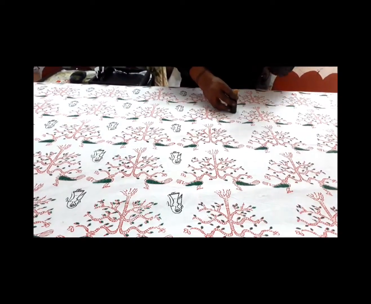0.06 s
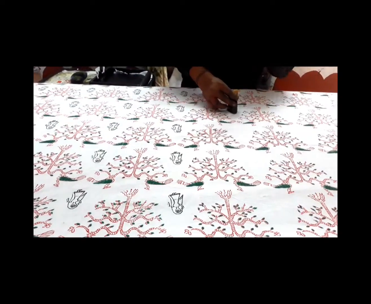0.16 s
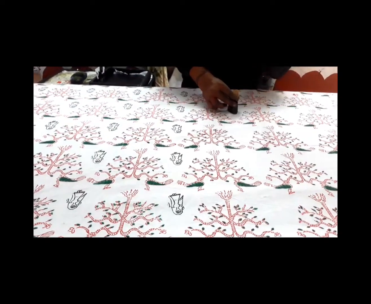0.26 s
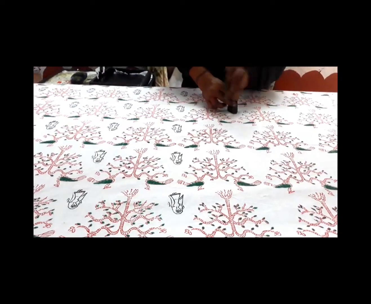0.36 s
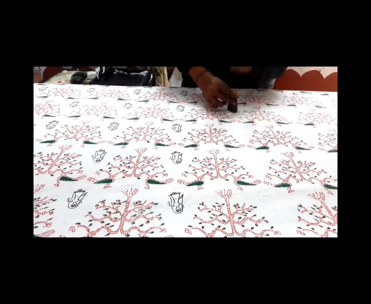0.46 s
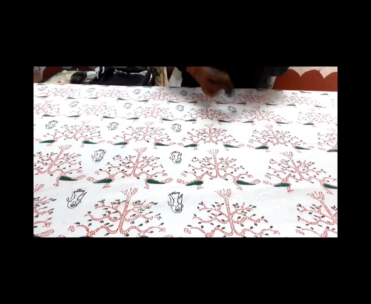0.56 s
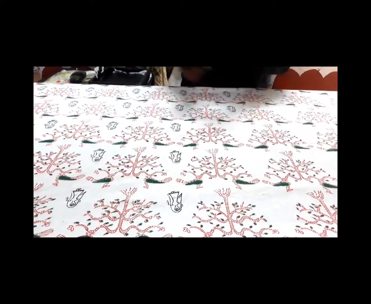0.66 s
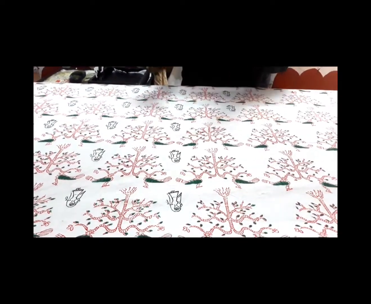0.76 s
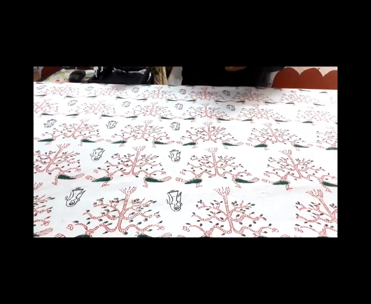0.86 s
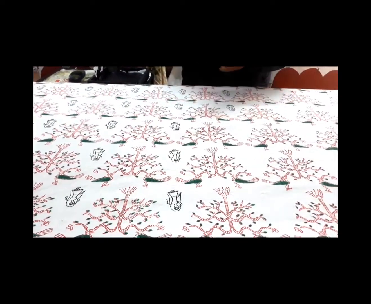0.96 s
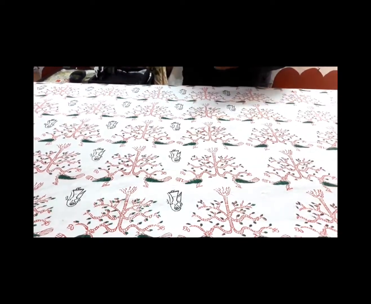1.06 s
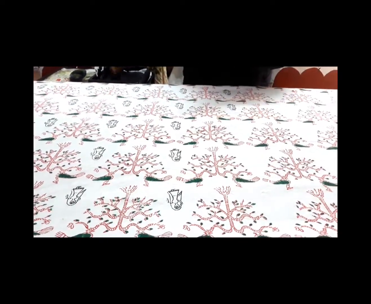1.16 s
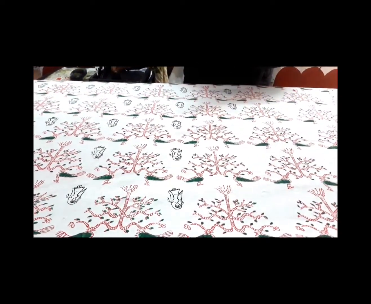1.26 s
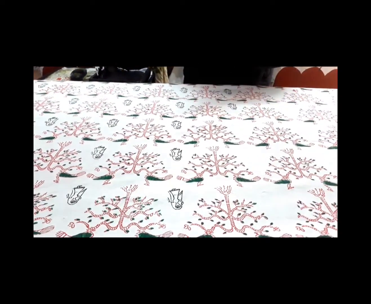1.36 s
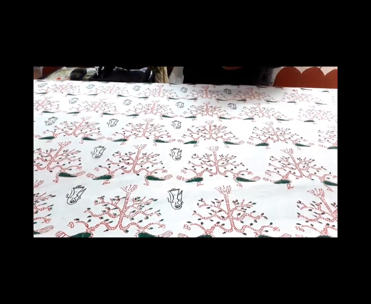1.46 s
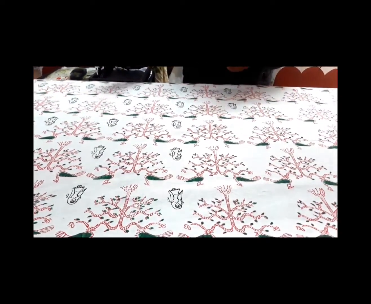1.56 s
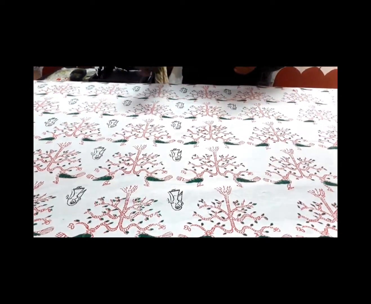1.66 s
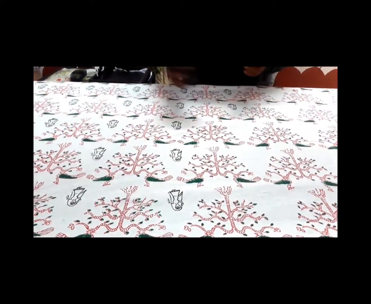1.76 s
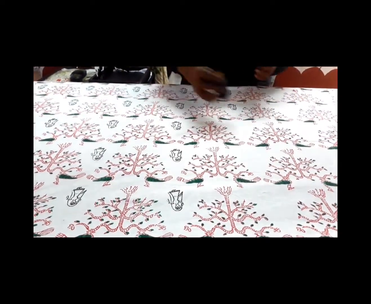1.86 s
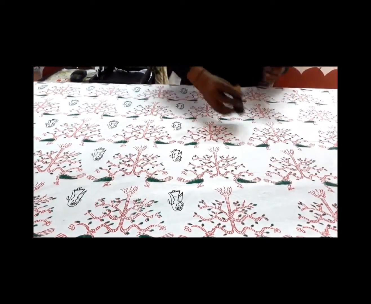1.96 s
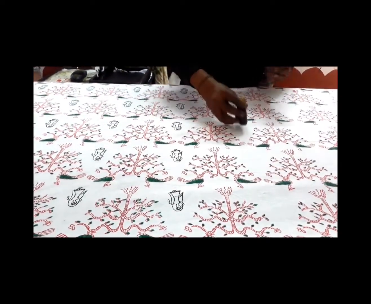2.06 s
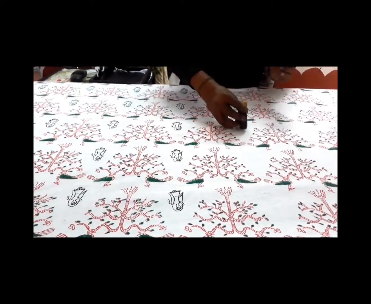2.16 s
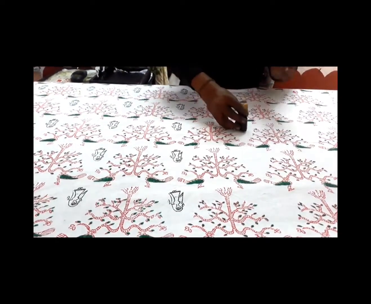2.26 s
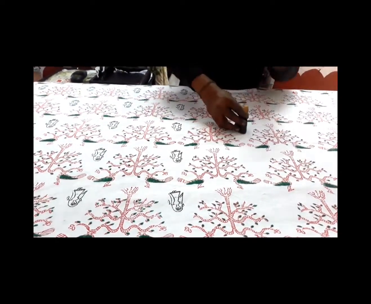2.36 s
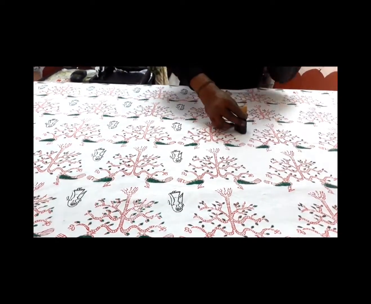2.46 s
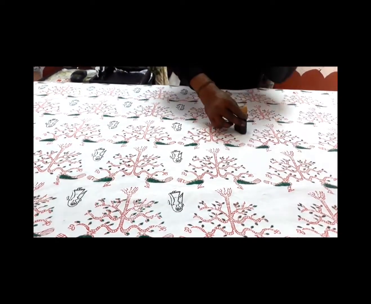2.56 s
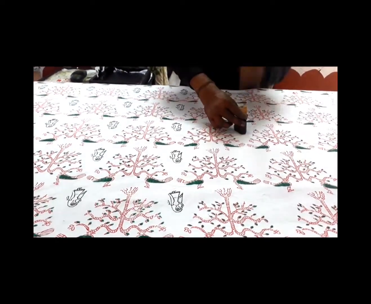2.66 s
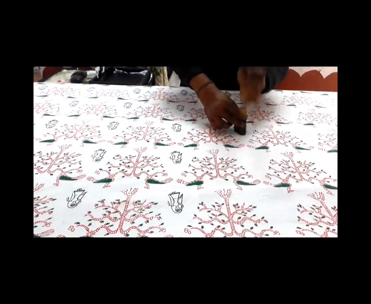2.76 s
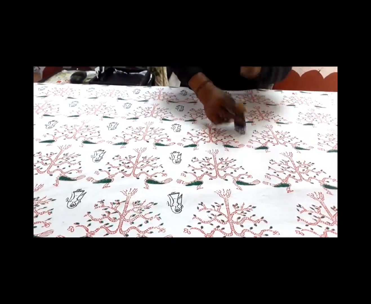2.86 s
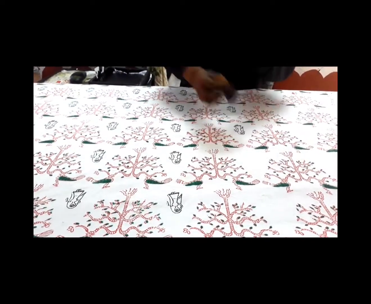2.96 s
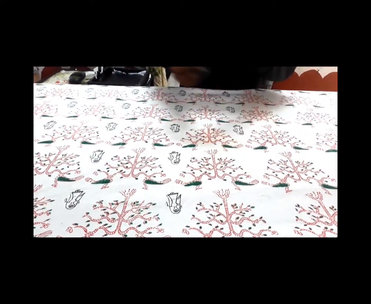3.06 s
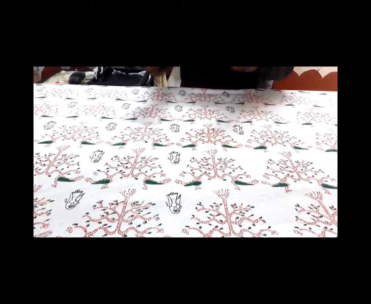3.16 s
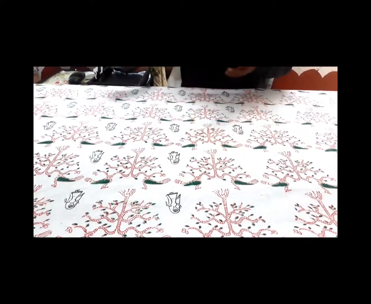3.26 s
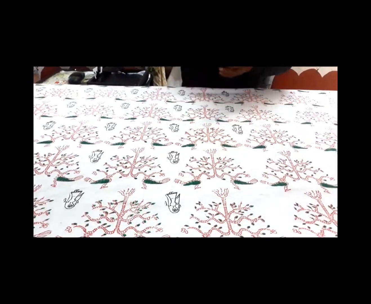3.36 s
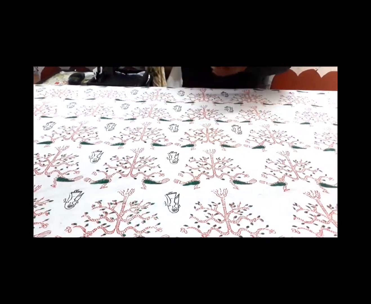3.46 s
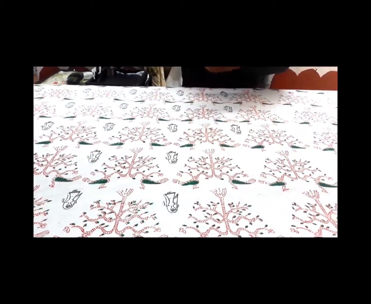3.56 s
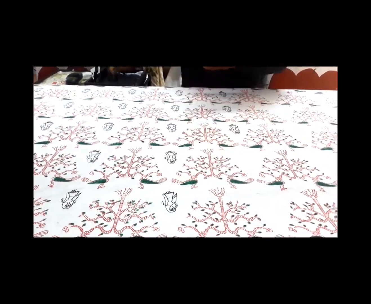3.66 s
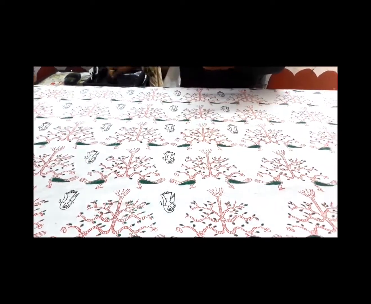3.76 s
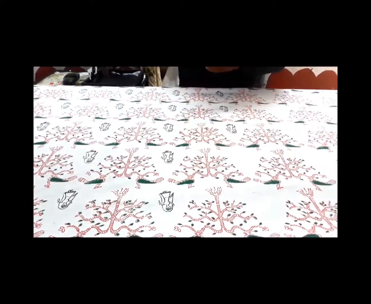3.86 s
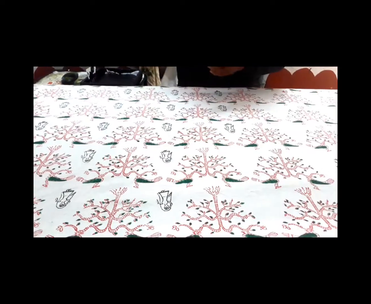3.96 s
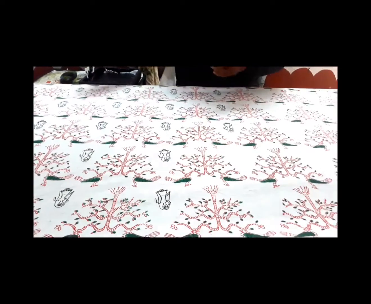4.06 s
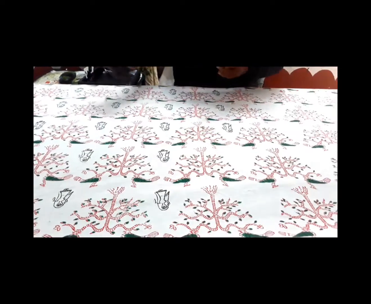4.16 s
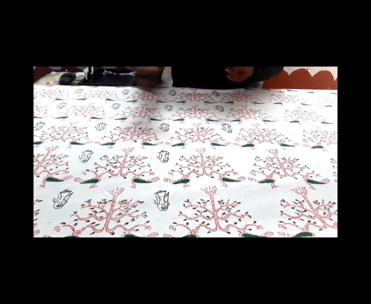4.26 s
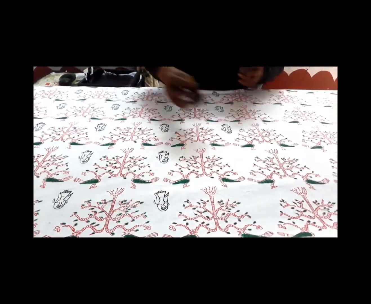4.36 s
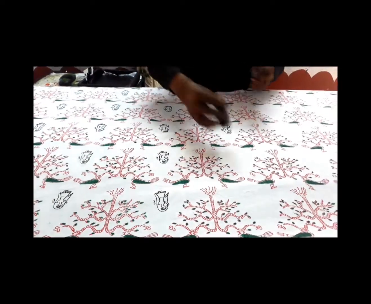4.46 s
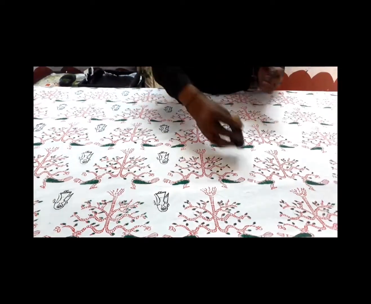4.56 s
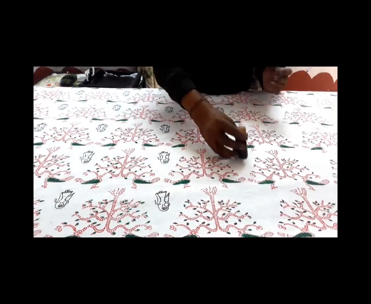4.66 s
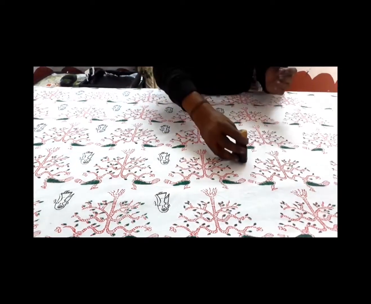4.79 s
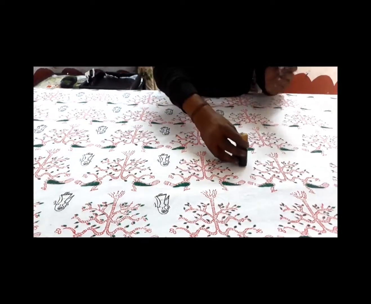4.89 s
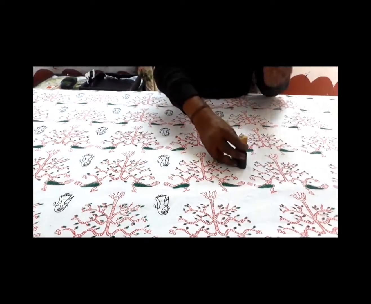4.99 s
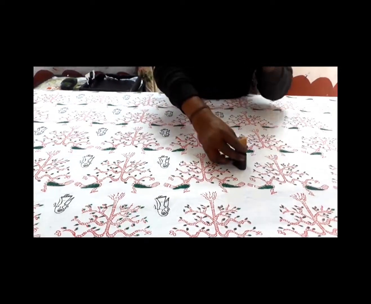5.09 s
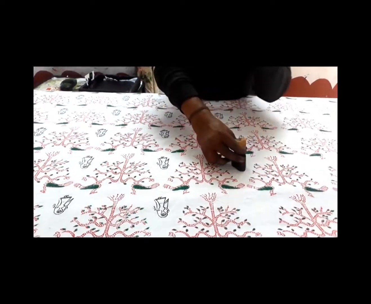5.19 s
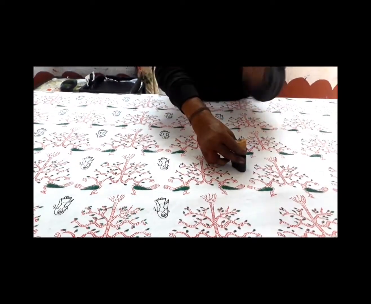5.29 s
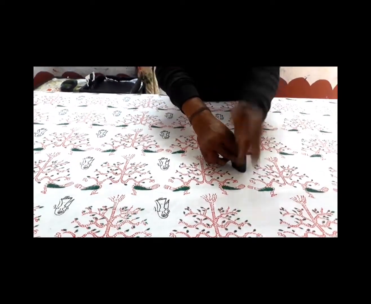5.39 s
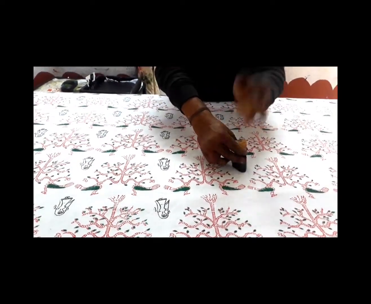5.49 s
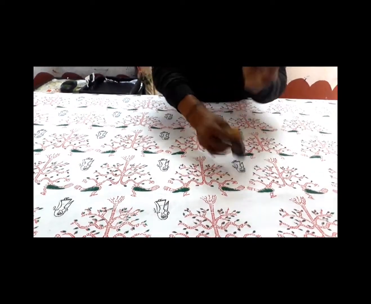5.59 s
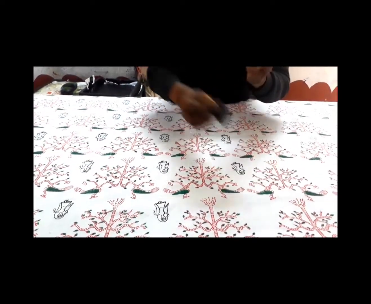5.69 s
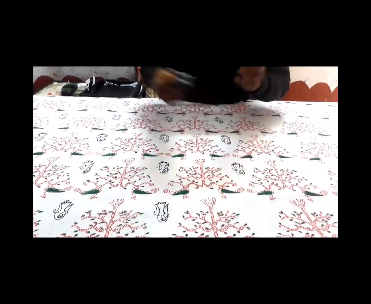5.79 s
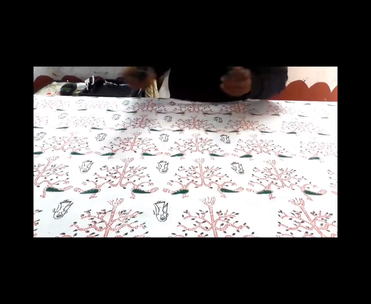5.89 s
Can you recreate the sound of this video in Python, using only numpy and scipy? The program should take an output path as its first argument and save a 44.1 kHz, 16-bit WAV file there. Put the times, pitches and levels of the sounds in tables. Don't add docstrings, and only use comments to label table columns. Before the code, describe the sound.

Three low wooden thumps of a hand-struck printing block on a padded table, with cloth swishes, small clacks and handling bumps over quiet room hum.

```python
import sys
import numpy as np
from scipy import signal
from scipy.io import wavfile

SR = 44100
rng = np.random.default_rng(int(sys.argv[2]) if len(sys.argv) > 2 else 0)


def int16_out(signal):
    q = np.round(np.clip(np.atleast_2d(signal).T, -1, 1) * 32767)
    wavfile.write(sys.argv[1], SR, q.astype(np.int16))


def boost_factor(decibels):
    exponent = np.asarray(decibels, float) / 20
    return 10 ** exponent


N = 261449

# (time [s], peak level [dB], slap level [dB], slap pitch [Hz], rebound level [dB])
BLOWS = [
    (0.419, -29.5, -52, 2740, -6),
    (2.7680, -28, -54, 2880, -6.5),
    (5.4409, -26, -40.5, 5020, -16.5),
]


def at_hz(points, hz, column):
    points = np.array(points)
    return np.interp(np.log(hz), np.log(points[:, 0]), points[:, column])


def rms_one(x):
    return x / np.sqrt(np.mean(x ** 2) + 1e-20)


def drift(rate):
    r = np.exp(-80 * np.pi * rate / SR)
    slow = signal.lfilter([1], [1, -2 * r, r * r], rng.standard_normal(N // 40 + 2002))[2000:]
    return np.interp(np.arange(N) / 40, np.arange(len(slow)), rms_one(slow))


def ring(x, hz, t60):
    r = boost_factor(-60 / (t60 * SR))
    w = 2 * np.pi * hz / SR
    return signal.lfilter([0, np.sin(w)], [1, -2 * r * np.cos(w), r * r], x + 1e-18)


def resonance(x, hz, width_hz):
    r = np.exp(-np.pi * width_hz / SR)
    top_gain_one = np.array([1, 0, -1]) * (1 - r * r) / 2
    return signal.lfilter(top_gain_one, [1, -2 * r * np.cos(2 * np.pi * hz / SR), r * r], x)


def bands(white, low_hz, count):
    edges = low_hz * 2 ** (np.arange(count + 1) / 3)
    out = []
    for k, (a, b) in enumerate(zip(edges, edges[1:])):
        band_pass = signal.butter(2, [a, b], "band", fs=SR, output="sos")
        out.append((np.sqrt(a * b), signal.sosfilt(band_pass, white[k % 2])))
    return out


def add(out, s, sound):
    i = round(s * SR)
    out[i:i + len(sound)] += sound[:N - i]


def push(t, width_s):
    return 1 / np.cosh(np.clip(t / width_s, -30, 30)) ** 2


def burst(hz, width_hz, t60, rise_s):
    t = np.arange(SR // 4) / SR
    noise = rng.standard_normal(len(t))
    for _ in range(2):
        noise = resonance(noise, hz, 0.91 * width_hz)
    return rms_one(noise) * boost_factor(-60 * t / t60) * np.minimum(t / rise_s, 1)


def strokes(rows, rise_db_per_s, sag_db_per_s, fall_db_per_s):
    time = np.arange(N) / SR
    gain = 0
    for s, hold_s, db in rows:
        rise = rise_db_per_s * np.maximum(s - time, 0)
        sag = sag_db_per_s * np.clip(time - s, 0, hold_s)
        fall = fall_db_per_s * np.maximum(time - s - hold_s, 0)
        gain = gain + boost_factor(db - rise - sag - fall)
    return gain


def hum(lumpy_db):
    # (frequency [Hz], level [dB])
    air_colour = [(16, -29), (28, -7), (49, -9.5), (209, -9.5), (354, -10), (449, -13), (1400, -17.5),
                  (3010, -16), (3820, -24.5), (6150, -26.5), (8010, -38), (11000, -30), (15500, -30.5)]
    # (frequency [Hz], side minus mid [dB])
    side_level = [(60, -25.5), (150, -18.5), (380, -15), (950, -8.5), (2380, -12.5), (5980, -5),
                  (15000, -5.5)]
    out = 0
    for hz, (mid, side) in bands(rng.standard_normal((2, 2, N)), 20.52, count=29):
        wander = lumpy_db * drift(10.2) / (1 + hz / 300)
        spread = boost_factor(at_hz(side_level, hz, 1)) * side * [[1], [-1]]
        out = out + boost_factor(at_hz(air_colour, hz, 1) + wander) * (mid + spread)
    return boost_factor(-65.5) * rms_one(out)


def swish(grain_db):
    # (frequency [Hz], density [dB per Hz])
    cloth_colour = [(530, -49), (900, -21.5), (1260, -11.5), (1430, -3.5), (1690, -10.5), (2900, 1),
                    (4020, -19), (7290, -24.5), (12000, -38), (15600, -60), (22000, -120)]
    # (start [s], hold [s], level [dB])
    sweeps = [
        (0.85, 0.065, -68),
        (1.64, 0.073, -56.5),
        (3.12, 0.25, -73.5),
        (4.47, 0.061, -64),
    ]
    hiss = 0
    for hz, band in bands(rng.standard_normal((2, N)), 905, count=11):
        hiss = hiss + boost_factor(at_hz(cloth_colour, hz, 1)) * band
    grainy = hiss * boost_factor(grain_db * drift(90))
    return strokes(sweeps, rise_db_per_s=150, sag_db_per_s=0, fall_db_per_s=114) * rms_one(grainy)


def thuds(lumpy_db):
    # (frequency [Hz], width [Hz], level [dB])
    layer_modes = [
        [(64, 40, -3), (97.6, 35, -2), (128, 32, -1.5)],
        [(205, 9, 3), (261.4, 41, -5), (335, 18.5, -2), (425, 52, -9)],
        [(594, 340, -5.5), (900, 720, -9)],
    ]
    # (start [s], hold [s], floor boom [dB], table top [dB], cloth drag [dB])
    shifts = [(0.84, 0.11, -71.5, -68, -76), (1.503, 0.17, -72.5, -70, -97), (1.73, 0.066, -59, -63, -74),
              (2.23, 0.28, -92, -70, -81), (2.551, 0.11, -70.5, -69, -71.5), (3.638, 0.049, -69, -66, -63),
              (3.772, 0.083, -73, -78, -73), (4.123, 0.045, -49, -51.5, -66.5),
              (4.188, 0.13, -58, -61.5, -79), (4.977, 0.0094, -64.5, -62.5, -68),
              (5.852, 0.044, -63, -67, -73.5)]
    out = 0
    for layer, modes in enumerate(layer_modes):
        drive = rng.standard_normal(N) * boost_factor(lumpy_db * drift(38))
        rung = 0
        for k, (hz, width_hz, db) in enumerate(modes):
            rung = rung + (-1) ** k * boost_factor(db) * resonance(drive, hz, width_hz)
        top_hz = modes[-1][0]
        dull = resonance(rung, top_hz / 6.1, top_hz)
        rows = [(s, hold_s, levels_db[layer]) for s, hold_s, *levels_db in shifts]
        gain = strokes(rows, rise_db_per_s=696, sag_db_per_s=15, fall_db_per_s=299)
        out = out + gain * rms_one(dull)
    return out


def rings():
    # (time [s], level [dB], frequency [Hz], swell [s], t60 [s])
    soft_knocks = [(1.724, -54, 205, 0.016, 0.73), (1.724, -51.5, 91, 0.015, 0.42),
                   (2.0593, -35.5, 165, .002, 0.029), (2.22, -64.5, 205, .05, 2.1),
                   (2.899, -61, 68.9, 0.043, 0.92), (4.011, -60, 335, 0.036, 1),
                   (4.116, -37, 184.6, 0.011, 0.23), (4.161, -48, 205, 0.017, 0.57),
                   (4.199, -44.5, 125.6, 0.022, 0.33), (4.595, -64, 244, 0.0084, 0.79),
                   (4.6107, -24.5, 2520, 0.00026, 0.0026), (5.581, -54.5, 72, 0.013, 0.71)]
    # (delay [s], level re rebound [dB], frequency [Hz], swell [s], t60 [s])
    frame_modes = [
        (.051, -19, 100.5, .014, 0.54),
        (0.049, -9, 364, 0.011, 0.14),
    ]
    after = []
    for s, db, _, _, rebound_db in BLOWS:
        for delay, below_db, *mode in frame_modes:
            after.append((s + delay, db + rebound_db + below_db, *mode))
    out, t = np.zeros(N), np.arange(SR) / SR
    for s, db, hz, swell_s, t60 in list(soft_knocks) + after:
        swell = 1 - np.exp(-t / swell_s)
        add(out, s, boost_factor(db - 60 * t / t60) * swell * np.sin(2 * np.pi * hz * t))
    return out


def clacks():
    # (time [s], level [dB], pitch [Hz], width [Hz], t60 [s])
    touches = [(1.265, -62.5, 1210, 1510, 0.07), (1.32, -57, 1800, 1800, 0.036),
               (1.3304, -52, 2730, 700, 0.072), (2.856, -63.5, 2770, 780, 0.27),
               (3.773, -48.5, 2640, 1080, 0.093), (3.785, -59, 1100, 650, 0.084),
               (3.834, -54.5, 2140, 1380, 0.12), (4.038, -57.5, 1000, 806, 0.04),
               (4.110, -57, 2720, 1540, 0.25), (4.113, -59.5, 1080, 1190, 0.27),
               (4.179, -57.5, 900, 900, 0.046), (4.6095, -46.5, 1780, 1470, 0.013),
               (4.613, -64, 2330, 1200, 0.17), (4.984, -54.5, 900, 1810, 0.054),
               (5.2934, -52.5, 990, 900, 0.056), (5.298, -50.5, 2960, 3000, 0.018),
               (5.391, -58, 2500, 1106, 0.02)]
    out = np.zeros(N)
    for s, db, hz, width_hz, t60 in touches:
        add(out, s, boost_factor(db) * burst(hz, width_hz, t60, rise_s=0.0016))
    return out


def lens(step_db, stop_db):
    full_steps = [0.2111, 0.6317, 0.8346, 1.2685, 1.794, 2.0247, 2.1099, 2.537, 2.942, 3.2995, 3.3948,
                  4.0343, 4.5091, 4.6746, 5.0268, 5.753]
    # (time [s], level [dB])
    half_steps = [(0.2664, -58.5), (0.4748, -51.5), (1.1336, -54), (1.4955, -57), (1.5252, -58),
                  (1.7555, -51), (2.396, -53), (2.8285, -58), (2.9653, -56.5), (2.9764, -55.5),
                  (3.0171, -55.5), (3.116, -55), (3.6759, -53.5), (3.7215, -55), (4.3138, -53),
                  (4.9546, -52), (5.3323, -58), (5.5965, -50)]
    full_db, stop_delay_s, step_s = -53.5, .0075, .00008
    out, t = np.zeros(N), np.arange(-40, 41) / SR
    cycle = -boost_factor(step_db) * np.tanh(t / step_s) * push(t, step_s)
    for s, db in half_steps:
        add(out, s, boost_factor(db) * cycle)
    for s in full_steps:
        add(out, s, boost_factor(full_db) * cycle)
        click = burst(10640, 3400, 0.0052, 0.0004) + burst(3450, 4600, 0.0078, 0.00056)
        add(out, s + stop_delay_s, boost_factor(full_db + stop_db) * click)
    return out


def bumps(casing_hz, damping, wider):
    # (time [s], level [dB], contact [ms], spring-back delay [ms], spring-back level [dB])
    presses = [
        (1.816, -49, 0.27, 1.34, 4),
        (2.058, -34.5, 0.42, 0.81, 0.8),
        (2.3777, -41.5, 0.057, 0.16, -3),
        (2.664, -49, 0.35, 2.1, 0),
        (3.7200, -45.5, 0.27, 2.9, 0.5),
        (5.5709, -17.5, .26, 0.65, 0),
        (5.6859, -44.5, 0.56, 2.97, 4.5),
    ]
    # (time [s], level [dB], contact [ms], spring-back delay [ms], spring-back level [dB])
    releases = [
        (1.9089, -8.5, 0.17, 0.61, -1),
        (2.5849, -29, 0.31, 0.76, 1.5),
        (3.5710, -47, 0.29, 1.3, -11),
        (3.634, -48.5, 0.36, 3.3, 0),
        (3.703, -43, 0.049, 0.45, -3),
        (5.2992, -36, 0.12, 1.12, -3),
    ]
    linger_db, linger_contacts = -13, 3.7
    out, t = np.zeros(N), np.arange(SR // 8) / SR - .005
    ms = 1000 * t
    w = 2 * np.pi * casing_hz
    b, a = signal.bilinear([1, 0, 0], [1, 2 * max(damping, .1) * w, w * w], SR)
    for direction, rows in ((1, presses), (-1, releases)):
        for s, db, contact_ms, back_ms, back_db in rows:
            spring_back = push(ms - back_ms, wider * contact_ms)
            creep = push(ms - back_ms - linger_contacts * contact_ms, 3.3 * contact_ms)
            touch = push(ms, contact_ms) - boost_factor(back_db) * (spring_back + boost_factor(linger_db) * creep)
            add(out, s + t[0], direction * boost_factor(db) * signal.lfilter(b, a, touch))
    return out


def blows(contact_s, ring_db, knock_db, tail_db, uneven_db):
    # (delay [s], level [dB], direction)
    contacts = [
        (.0004, -23, -1.05),
        (.002, -19, 0.83),
        (.0033, -10.5, -0.82),
        (.0046, -1, 0.86),
        (0.0113, -13, 1),
    ]
    # (frequency [Hz], level [dB], t60 [s], direction seen from the microphone)
    table_modes = [(48, -40, .6, 0.85), (72, -6, 0.76, 0.85), (102.8, -1, 0.22, 1), (205, -3, 0.36, 0.52),
                   (276, -4.5, 0.25, -1.1), (330, -2, 0.096, -0.0071), (364, 4.5, 0.14, -0.77),
                   (436, -6.5, 0.1, -1.16), (554, -8.5, 0.076, -1.3), (634.5, -0.5, 0.1, -1.26),
                   (852, -3.5, 0.19, 0.38), (1000, -11, 0.055, -1.2)]
    # (frequency [Hz], density [dB per Hz], t60 [s])
    room_tail = [(40.6, -3.5, 1), (104, -2, 0.45), (252, -7, 0.45), (507, 0.5, 0.21), (900, -31.5, 0.085),
                 (2500, -29, 0.47), (6000, -49.5, 0.62)]
    out, t = np.zeros(N), np.arange(SR) / SR
    settle = boost_factor(-8.5 * np.clip((t - 0.0447) / 0.0058, 0, 1))
    for s, db, slap_db, slap_hz, rebound_db in BLOWS:
        force = 0
        for delay, level_db, direction in contacts:
            force = force + direction * boost_factor(level_db) * push(t - delay, contact_s)
        rebound = boost_factor(rebound_db) * push(t - .0405, 2.2 * contact_s)
        table = 0
        for hz, mode_db, t60, direction in table_modes:
            mode_gain = boost_factor(mode_db + uneven_db * rng.standard_normal())
            table = table + direction * mode_gain * ring(force, hz, t60)
        knock = resonance(force, 368, 235) + boost_factor(12.5) * resonance(rebound, 384, 70)
        tail = 0
        for hz, band in bands(rng.standard_normal((2, SR)), 28.9, count=25):
            tail = tail + boost_factor(at_hz(room_tail, hz, 1) - 60 * t / at_hz(room_tail, hz, 2)) * band
        tail = tail * np.minimum(t / 0.0037, 1)
        wood = settle * (boost_factor(ring_db) * table - boost_factor(knock_db) * knock)
        add(out, s, boost_factor(db) * (boost_factor(tail_db) * tail * np.sqrt(settle) + wood))
        slap = burst(slap_hz, 1000, 0.0089, 0.00081) + boost_factor(-6.0) * burst(10500, 3000, 0.0052, 0.00033)
        add(out, s, boost_factor(slap_db) * slap)
        add(out, s, boost_factor(db - 22.0) * burst(1320, 2730, 0.048, 0.0009))
    return out


def scene():
    background = hum(lumpy_db=6.5) + swish(grain_db=0.5) + thuds(lumpy_db=3.0)
    body = lens(step_db=13, stop_db=-2.0) + bumps(casing_hz=65, damping=1.0, wider=1.5)
    thumps = blows(contact_s=0.00038, ring_db=-34.5, knock_db=9, tail_db=7.0, uneven_db=-0.2)
    return background + body + rings() + clacks() + thumps


def top_cut(x):
    return signal.sosfilt(signal.butter(12, 16260, fs=SR, output="sos"), x)


def record(dry):
    capsule = signal.sosfilt(signal.butter(2, 45, "high", fs=SR, output="sos"), dry)
    cut = signal.sosfilt(signal.cheby2(14, 60, 16200, fs=SR, output="sos"), capsule)
    return top_cut(cut - .0004)


dry = scene()
out = record(dry)
int16_out(out)
```